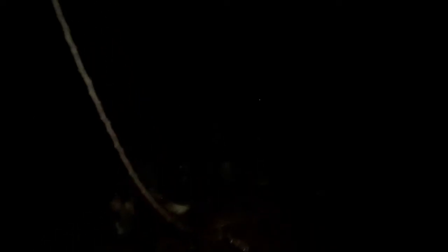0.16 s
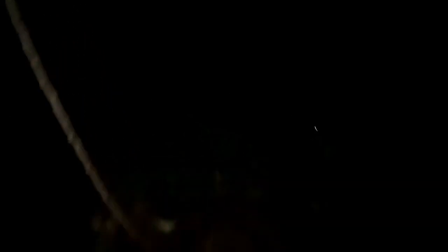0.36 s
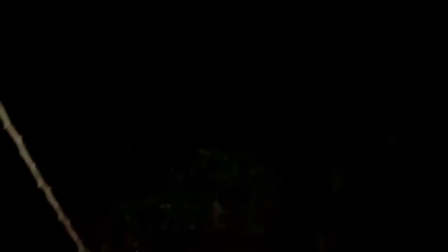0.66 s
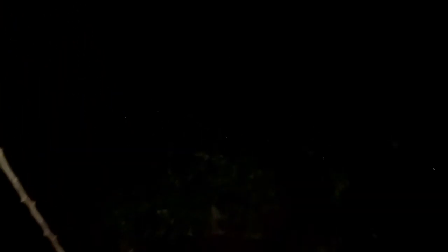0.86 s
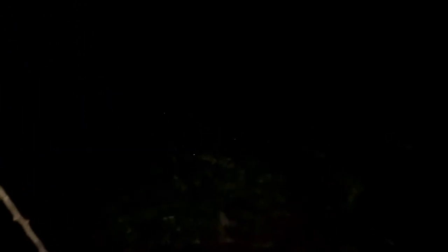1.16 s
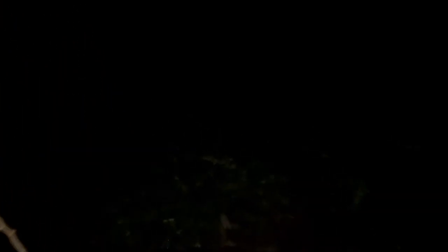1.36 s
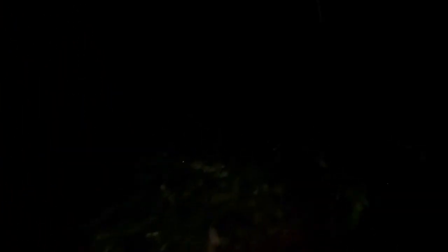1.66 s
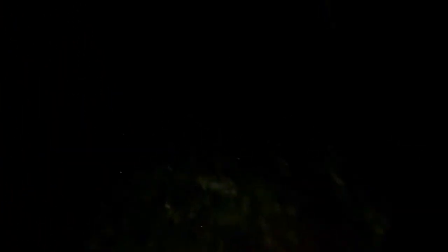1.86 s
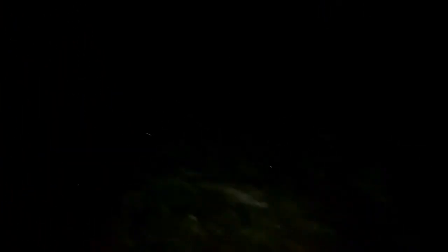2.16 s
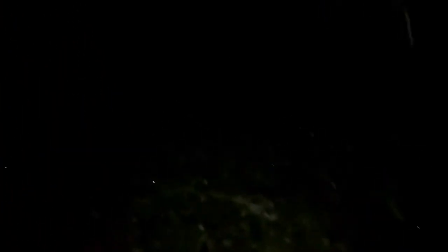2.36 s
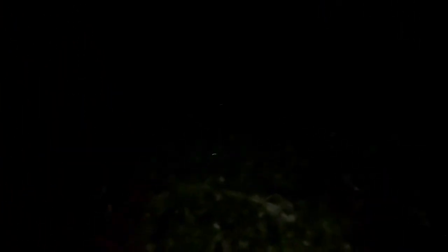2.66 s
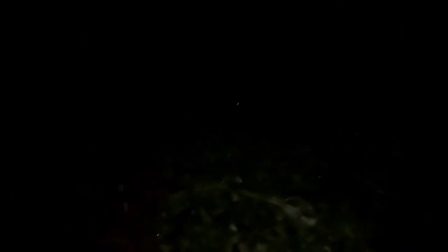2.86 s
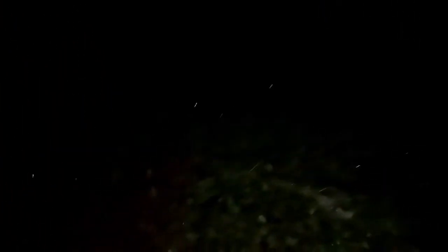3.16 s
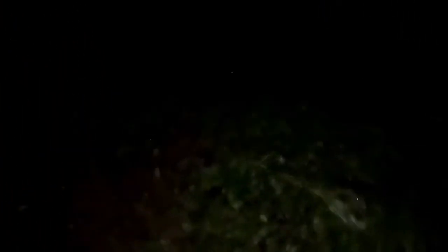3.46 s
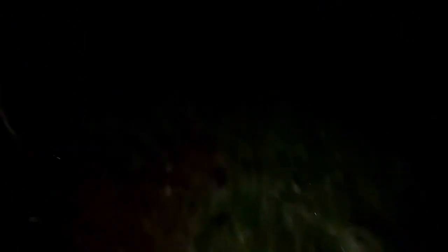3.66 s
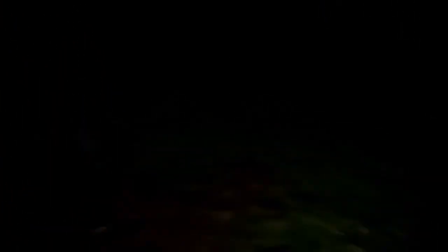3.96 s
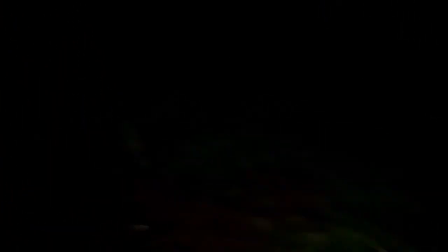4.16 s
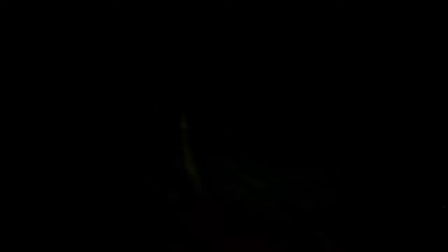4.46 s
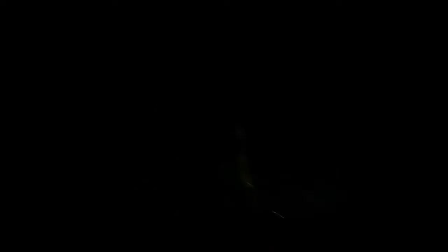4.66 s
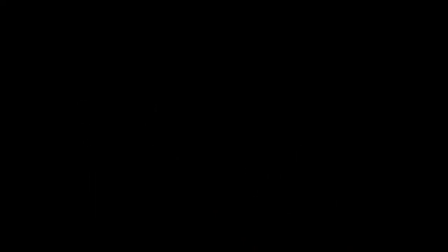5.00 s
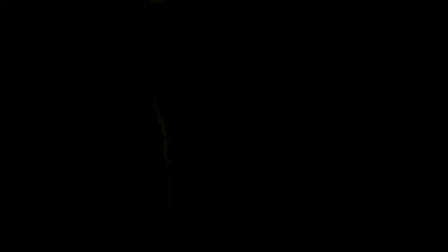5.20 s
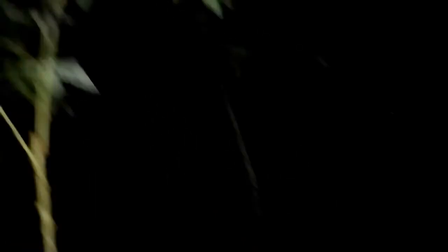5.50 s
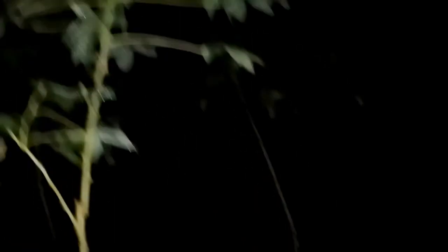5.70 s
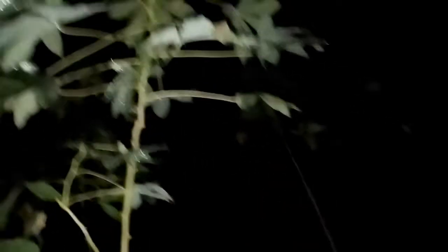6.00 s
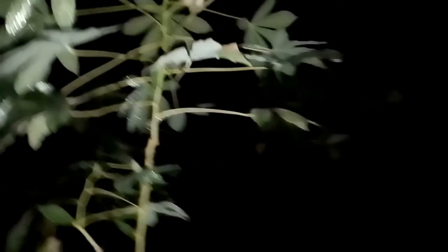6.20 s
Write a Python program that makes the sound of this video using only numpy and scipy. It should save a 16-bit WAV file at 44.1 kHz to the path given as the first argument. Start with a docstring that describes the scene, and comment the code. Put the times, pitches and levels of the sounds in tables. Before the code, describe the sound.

A continuous high night chorus of crickets and a faintly rasping katydid, while a few twigs crack briefly later on.

```python
"""A planted field at night, heard by a slowly moving listener.
Near crickets drag file over scraper and buzz at about 4.2 kHz through the foliage. A lower cricket
trills in rising syllables, a katydid rasps in double strokes, and far insects merge into a shimmer
over a faint murmur of air. In the second half, two soft handling bumps and a few dry twig snaps."""
import sys
import numpy as np
from scipy import signal
from scipy.fft import rfft, irfft, next_fast_len
from scipy.io import wavfile
from scipy.ndimage import uniform_filter1d, map_coordinates

SR = 44100
rng = np.random.default_rng(int(sys.argv[2]) if len(sys.argv) > 2 else 0)


def store_wav(level_fs):
    """Save 16-bit WAV to argv[1]."""
    pcm = np.round(np.clip(np.atleast_2d(level_fs), -1, 1) * 32767)
    wavfile.write(sys.argv[1], SR, pcm.T.astype(np.int16))


N = 279594
T = np.arange(N) / SR

# near crickets together, as leaves shade and uncover them: t/s, level/dB
BUZZ_DB = [(0.0, -47.0), (0.35, -44.5), (0.52, -50.2), (0.75, -46.4), (1.28, -52.9), (1.54, -47),
           (1.7, -51.5), (2.2, -46.5), (2.65, -45.0), (3.13, -48), (3.45, -44.5), (3.6, -47), (3.8, -43),
           (4.15, -45), (4.6, -47.5), (5.4, -43.5), (5.85, -46), (6.34, -44)]
# their common pitch: t/s, f/Hz
BUZZ_PITCH_HZ = [(0, 4210), (.3, 4210), (.75, 4238), (1.5, 4280), (2.4, 4243), (4.1, 4240), (4.63, 4158),
                 (5.4, 4257), (6.05, 4190), (6.34, 4280)]
# wing strokes, per cricket: rate/Hz, wander/fraction
BUZZ_STROKES = [(73.3, .0008), (71.78, .0012), (83.4, .004), (65.6, .004), (61, .005)]
# voice, per cricket: pitch offset/Hz, level/dB
BUZZ_VOICES = [(18, -5), (0, -6.5), (70.5, -11.5), (-58, -10), (18.5, -12.5)]
# wing radiation: f/Hz, gain/dB
WING_RESPONSE_DB = [(3000, -16), (3550, -9.5), (3800, 1), (3950, -2), (4060, 1.5), (4300, 0), (4400, 3.5),
                    (4460, -1), (4530, -10.5), (4660, -1), (5000, -24.5)]
# low triller's syllables: t/s, rate/Hz
TRILL_RATE_HZ = [(0, 23.35), (2.4, 23.45), (2.75, 23.8), (3.1, 23.45), (6.34, 23.42)]
# low triller: t/s, level/dB
TRILL_DB = [(0, -68), (1, -66.5), (3.5, -68), (5.5, -67), (6.34, -69.5)]
# its thin ring: t/s, level/dB
TRILL_RING_DB = [(0, -74), (4.2, -76), (4.95, -68.5), (5.65, -74), (5.95, -68), (6.34, -64)]
# katydid, as the listener turns: t/s, level/dB
KATYDID_DB = [(0, -73), (.5, -69.5), (1.35, -68), (1.85, -75), (2.5, -72), (3.1, -67), (3.6, -67),
              (4.05, -63), (4.6, -72), (4.9, -76), (6.34, -77)]
# its double strokes: t/s, rate/Hz
KATYDID_RATE_HZ = [(0, 7.64), (1.9, 7.08), (3.1, 7.58), (3.4, 7.86), (4.2, 7.09), (4.8, 8.03), (6.34, 6.05)]
# wings open with a swell, close with a hard start: start/cycle, attack/cycle, release/cycle, level/dB
KATYDID_STROKES = [(.06, .23, .11, 0), (.57, 0.076, 0.28, 1)]
# its rasp: f/Hz, level/dB
RASP_SPECTRUM_DB = [(9500, -32), (11800, -16), (13500, -10), (14500, -5), (15200, 0), (15600, 1),
                    (16500, -10)]
# far chorus: t/s, level/dB
CHORUS_DB = [(0, -63.5), (.7, -62.5), (1.3, -62), (2.1, -62.7), (5, -63), (6.34, -62.5)]
# its colour: f/Hz, level/dB
CHORUS_SPECTRUM_DB = [(4900, -21), (5300, -23.5), (5600, 2), (6000, -0.5), (6400, 0.5), (6900, -3),
                      (7500, -5), (8000, -8), (8600, -13.5), (9300, -16.5), (10500, -35)]
# murmur of air: t/s, level/dB
MURMUR_DB = [(0, -76), (1.6, -74), (2.7, -76), (5.4, -75), (6.1, -73), (6.34, -74.5)]
# its colour: f/Hz, level/dB
MURMUR_SPECTRUM_DB = [(20, -2), (55, -14.5), (80, -12), (160, -21.5), (200, -4.5), (280, -1.5), (350, -1.5),
                      (520, -6.5), (680, -9), (900, -10.5), (2000, -18.5)]
# far drone: t/s, level/dB
DRONE_DB = [(0, -91), (1.2, -89), (3, -101), (3.6, -91), (5.3, -90.5), (5.7, -85), (6.34, -91)]
# faint hiss: f/Hz, level/dB
HISS_SPECTRUM_DB = [(200, -10), (900, -10.5), (2000, 1), (2500, 11.5), (2750, 3.5), (2920, 11.5),
                    (3200, -0.5), (3600, 9.5), (5000, 2.5), (9500, -5.5), (12000, -3.5), (15500, -3.5)]
# handling bumps: t/s, level/dB
BUMPS = [(3.39, -70.5), (6.07, -76)]
# twig snaps: t/s, knock/dB, snap/dB, snap centre/Hz, snap half-width/Hz
TWIG_SNAPS = [(3.523, -85, -58, 1580, 380), (5.289, -81, -60, 796, 1500), (5.39, -79, -61, 1220, 1190),
              (5.851, -85, -56.5, 2750, 700), (5.961, -67, -50.5, 2840, 450),
              (6.004, -50.5, -50, 2920, 1100)]
# twig resonances: f/Hz, level/dB, t60/s
WOOD_MODES = [(625, -2.5, 0.067), (682, 1, 0.043), (890, -5, 0.029), (1045, -5, 0.022), (1510, -8, 0.057),
              (1900, -8, 0.035)]


def amp(db):
    """Decibels to gain."""
    return 10 ** (np.asarray(db) / 20)


def unit(x):
    """Scale to rms 1."""
    return x / np.sqrt(np.mean(x ** 2) + 1e-20)


def steady(x, window_samples):
    """Hold the running rms near 1."""
    return x / np.sqrt(np.abs(uniform_filter1d(x ** 2, size=window_samples)) + 1e-6)


def curve(rows):
    """(t/s, value) rows to one value per sample."""
    return np.interp(T, *np.transpose(rows))


def wobble(rate_hz):
    """Smooth random curve, rms about 1."""
    knots = rng.standard_normal(400)
    return np.interp(T, T[::64], map_coordinates(knots, [T[::64] * rate_hz], mode="wrap"))


def sine(hz):
    """Sine following a per-sample frequency."""
    return np.sin(2 * np.pi * np.cumsum(hz) / SR)


def filtered(x, response):
    """Apply the gain response(hz)."""
    size = next_fast_len(N + SR // 2)
    return irfft(rfft(x, size) * response(np.fft.rfftfreq(size, 1 / SR)), size)[:N]


def noise(spectrum):
    """Noise of rms 1 from (f/Hz, level/dB) rows, closed at both ends."""
    knots_hz, db = np.transpose(spectrum)
    colour = lambda hz: amp(np.interp(np.log(hz + 1), np.log(knots_hz), db, -120, -120))
    return unit(filtered(rng.standard_normal(N), colour))


def band(centre_hz, half_width_hz):
    """Noise of rms 1 in one resonance."""
    resonance = lambda hz: 1 / (1 + ((hz - centre_hz) / half_width_hz) ** 2)
    return unit(filtered(rng.standard_normal(N), resonance))


def foliage(x, wet_db, t60_s, patterns):
    """Leaves scatter the sound; echo patterns crossfade as the listener moves."""
    t = T[:SR // 4]
    position = T / T[-1] * (patterns - 1)
    out = x.copy()
    for k in range(patterns):
        tail = rng.standard_normal(len(t)) * amp(-60 * t / t60_s)
        fade = np.cos(np.pi / 2 * np.clip(position - k, -1, 1))
        start, end = np.flatnonzero(fade > 1e-6)[[0, -1]]
        echo = signal.fftconvolve((x * fade)[start:end], tail / np.linalg.norm(tail))[:N - start]
        out[start:start + len(echo)] += amp(wet_db) * echo
    return unit(out)


def wing_strokes(rate_hz, pitch_hz, wander, stroke_s=.0062, sag_hz=430):
    """Each stroke drags file over scraper: a short tone, falling as the wing slows."""
    strokes = rng.random() + np.cumsum(rate_hz * (1 + wander * wobble(20))) / SR
    progress = np.clip(strokes % 1 / rate_hz / stroke_s, 0, 1)
    strength = amp(rng.standard_normal(1000))[strokes.astype(int)]
    envelope = np.abs(np.sin(np.pi * progress)) ** .7
    from_middle = progress - .5
    phase = 2 * np.pi * stroke_s * (pitch_hz * from_middle - sag_hz * from_middle ** 2 / 2)
    return unit(strength * envelope * np.sin(phase))


def buzzing_crickets(throb_hz=3.56, throb_peak_s=.117, throb_db=.74, flutter_db=1.07):
    """Near crickets beat at unequal stroke rates; together they swell and sink."""
    pitch_hz = curve(BUZZ_PITCH_HZ)
    song = np.zeros(N)
    for (rate_hz, wander), (offset_hz, db) in zip(BUZZ_STROKES, BUZZ_VOICES):
        strokes = wing_strokes(rate_hz, pitch_hz + offset_hz, wander)
        song += amp(db) * foliage(strokes, wet_db=2, t60_s=.18, patterns=22)
    song = filtered(song, lambda hz: amp(np.interp(hz, *np.transpose(WING_RESPONSE_DB), -120, -120)))
    throb = np.cos(2 * np.pi * throb_hz * (T - throb_peak_s))
    level_db = curve(BUZZ_DB) + throb_db * throb + flutter_db * wobble(12)
    return amp(level_db) * steady(song, window_samples=4000)


def low_triller(tone_duty=.31, low_hz=2215, glide_hz=370, overtone_db=-2, scrape_db=-15):
    """Rising syllables: a scrape as the wings touch, the tone, a rough overtone with a thin ring."""
    hump = lambda u: np.sin(np.pi * np.clip(u, 0, 1)) ** 2
    cycle = (.08 + np.cumsum(curve(TRILL_RATE_HZ)) / SR) % 1
    progress = np.clip(cycle / tone_duty, 0, 1)
    pitch_hz = low_hz + glide_hz * progress ** 3 + 18 * wobble(30)
    tone = np.sqrt(hump(progress)) * sine(pitch_hz) * amp(1.3 * wobble(16))
    scrape = amp(scrape_db) * hump((cycle + .19) % 1 / .55) * band(3184, 200)
    closing = hump((cycle + .022) % 1 / .82)
    overtone = amp(overtone_db) * unit(closing * band(7130, 980))
    ring = amp(curve(TRILL_RING_DB)) * unit(closing * band(6680, 50))
    scattered = foliage(tone + scrape, wet_db=-1.5, t60_s=.12, patterns=40)
    return ring + amp(curve(TRILL_DB)) * (steady(scattered, window_samples=7500) + overtone)


def katydid(tooth_hz=330, tooth_depth_db=2, uneven_db=.2):
    """Paired dry file strokes at a drifting tempo; the teeth ripple the rasp."""
    cycle = (np.cumsum(curve(KATYDID_RATE_HZ)) / SR - .064) % 1
    strokes = sum(amp(db) * np.interp(cycle - start, [0, attack, attack + release], [0, 1, 0]) ** .75
                  for start, attack, release, db in KATYDID_STROKES)
    teeth = unit(amp(tooth_depth_db * sine(tooth_hz + 50 * wobble(29))))
    level_db = curve(KATYDID_DB) - uneven_db * wobble(18)
    return amp(level_db) * strokes * teeth * noise(RASP_SPECTRUM_DB)


def far_crickets(count=20, low_hz=5700, span_hz=2100):
    """Far crickets trill on their own pitches, drifting in and out of hearing."""
    out = np.zeros(N)
    for k, (detune, speed, start) in enumerate(rng.random((count, 3))):
        pitch_hz = low_hz + span_hz * (k + detune) / count
        rate_hz = 10 + 26 * speed
        syllables = np.sin(np.pi * (start + rate_hz * T)) ** 4
        level_db = np.interp(pitch_hz, *np.transpose(CHORUS_SPECTRUM_DB)) + 5 * wobble(7)
        out += syllables * amp(level_db) * sine(pitch_hz + 18 * wobble(25))
    return unit(out)


def far_chorus():
    """Many far insects merge into a shimmer."""
    shimmer = noise(CHORUS_SPECTRUM_DB) + .85 * far_crickets()
    return amp(curve(CHORUS_DB) + .32 * wobble(28)) * shimmer


def far_chirper(rate_hz=8.8, depth_db=11, level_db=-72.5):
    """One slow chirper stands out of the chorus."""
    chirps = unit(amp(depth_db * sine(rate_hz + .15 * wobble(5.7))))
    return amp(level_db) * chirps * band(5760, 90)


def night_air(hiss_db=-66):
    """Low murmur, far drone, faint hiss."""
    murmur = amp(curve(MURMUR_DB) + .6 * wobble(8)) * noise(MURMUR_SPECTRUM_DB)
    drone = amp(curve(DRONE_DB)) * band(102.6, 8.4)
    return murmur + drone + amp(hiss_db) * noise(HISS_SPECTRUM_DB)


def handling_bumps(half_width_s=.046):
    """Soft bumps of a hand: brief swells of low noise."""
    envelope = sum(amp(db) * np.exp(-((T - at_s) / half_width_s) ** 2) for at_s, db in BUMPS)
    return envelope * band(362, 69)


def twigs(attack_s=.00032, snap_t60_s=.034, low_cut_hz=400):
    """Dry snaps, each with a brief ring of the wood; bass filtered out."""
    out, t = np.zeros(N + SR), T[:SR // 8]
    onset = 1 - np.exp(-t / attack_s)
    for at_s, knock_db, snap_db, snap_hz, half_width_hz in TWIG_SNAPS:
        knock = sum(amp(db - 60 * t / t60_s) * np.sin(2 * np.pi * (hz * t + rng.random()))
                    for hz, db, t60_s in WOOD_MODES)
        snap = band(snap_hz, half_width_hz)[:len(t)] * amp(-60 * t / snap_t60_s)
        out[round(at_s * SR):][:len(t)] += (amp(knock_db) * knock + amp(snap_db) * snap) * onset
    return signal.sosfilt(signal.butter(2, low_cut_hz, "high", fs=SR, output="sos"), out[:N])


def scene():
    """Insects over the quiet night; mono."""
    insects = buzzing_crickets() + low_triller() + katydid() + far_chorus() + far_chirper()
    return (insects + night_air() + handling_bumps() + twigs())[None]


def record(dry):
    """Brick-wall low-pass."""
    cutoff_hz = 15520
    return filtered(dry[0], lambda hz: hz < cutoff_hz)[None]


dry = scene()
out = record(dry)
store_wav(out)
```